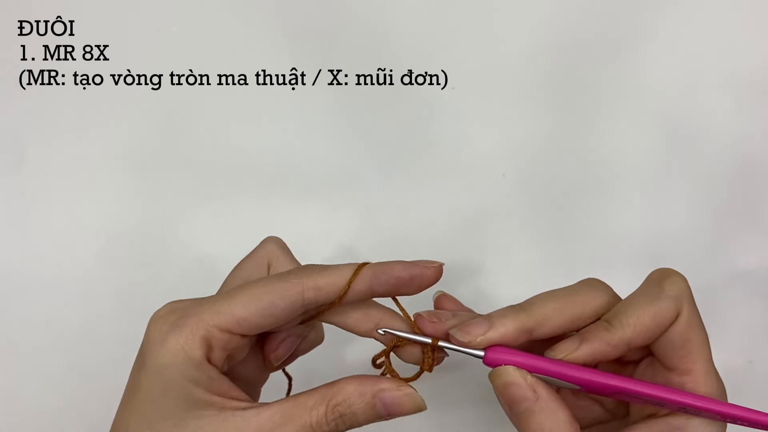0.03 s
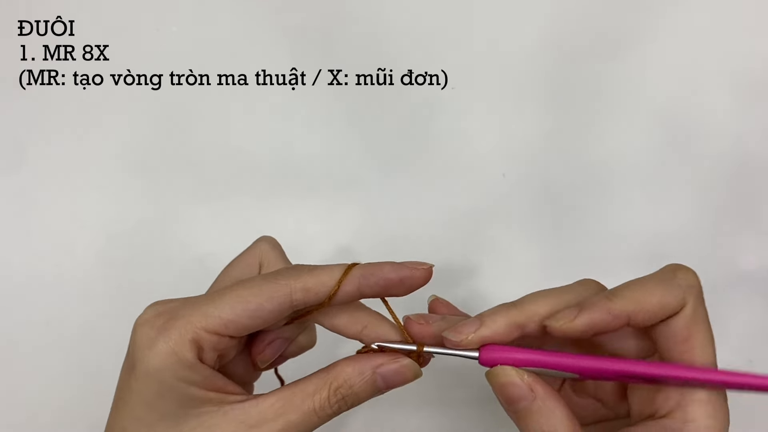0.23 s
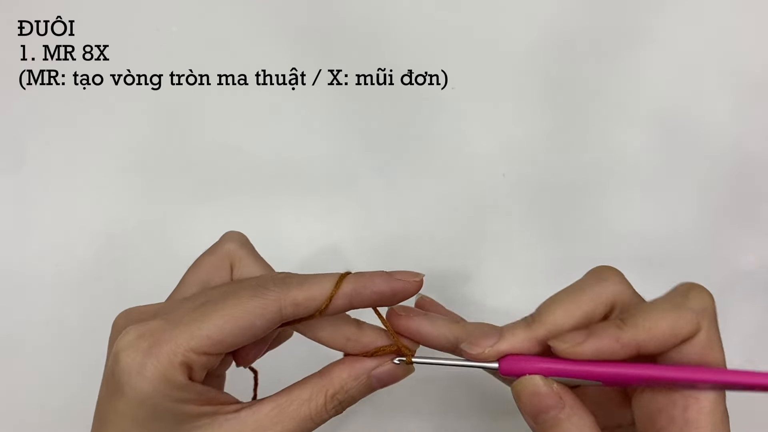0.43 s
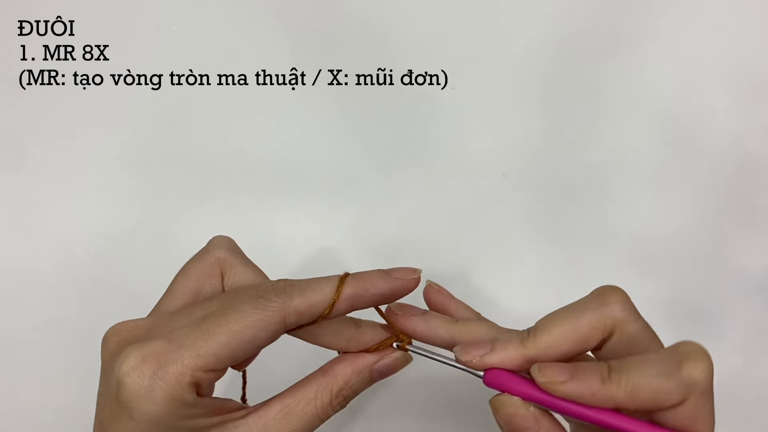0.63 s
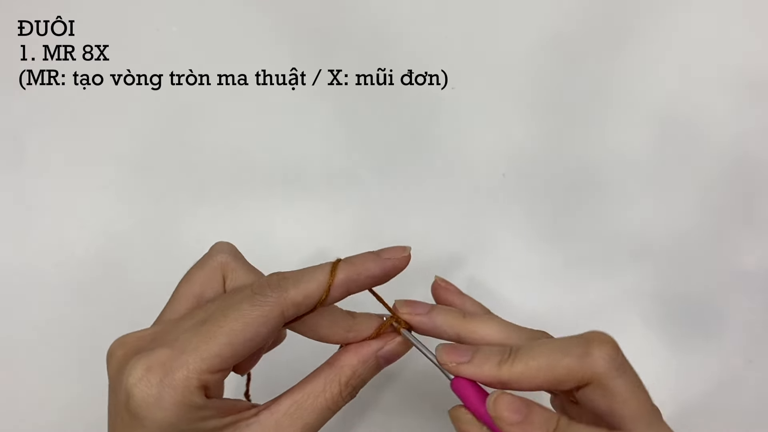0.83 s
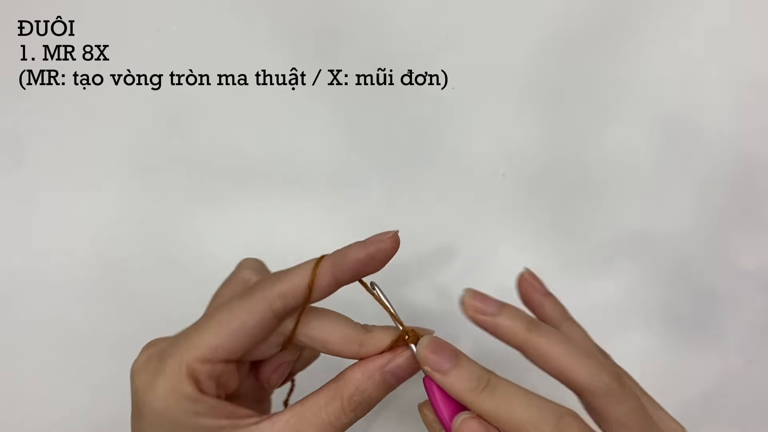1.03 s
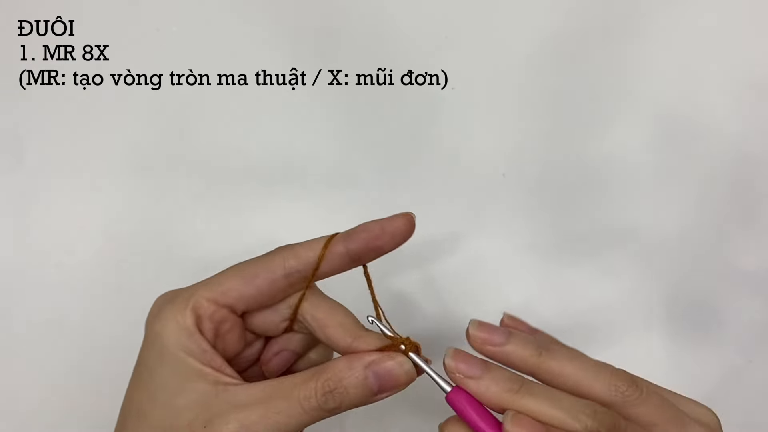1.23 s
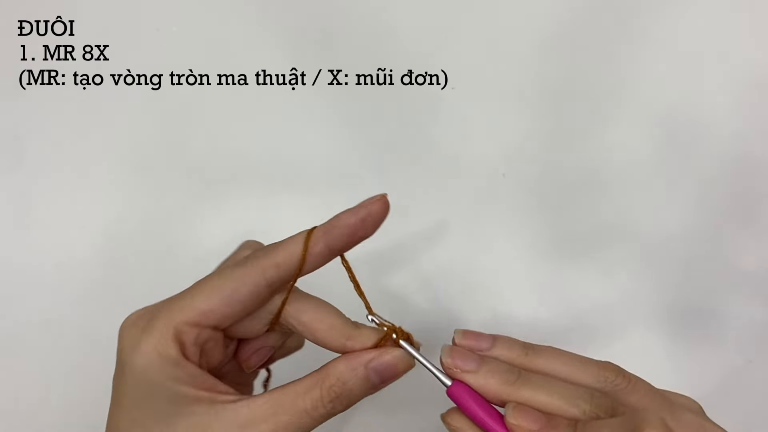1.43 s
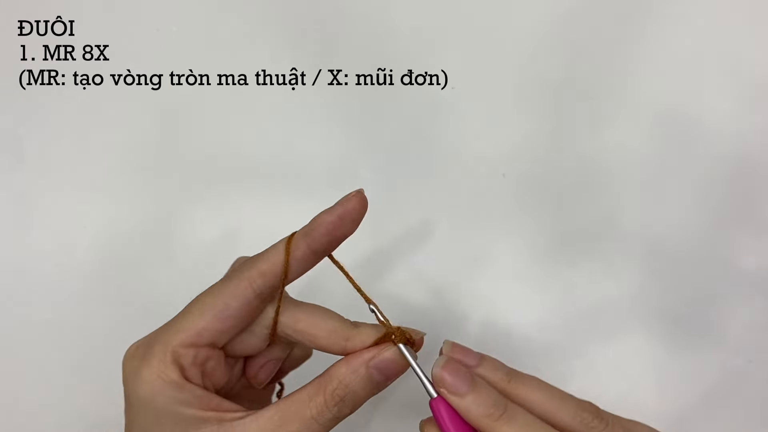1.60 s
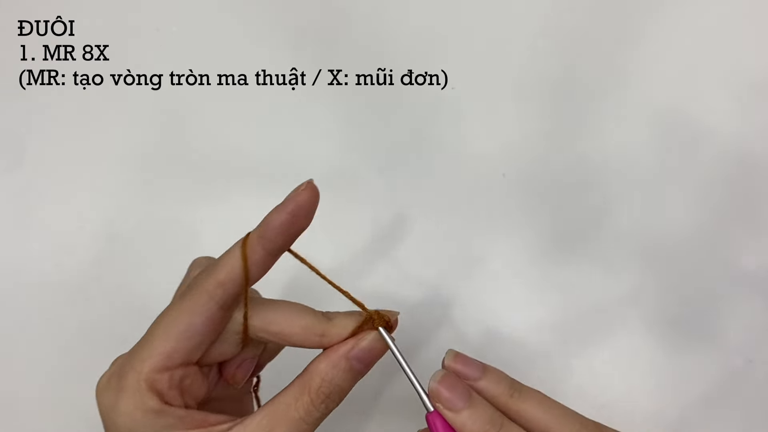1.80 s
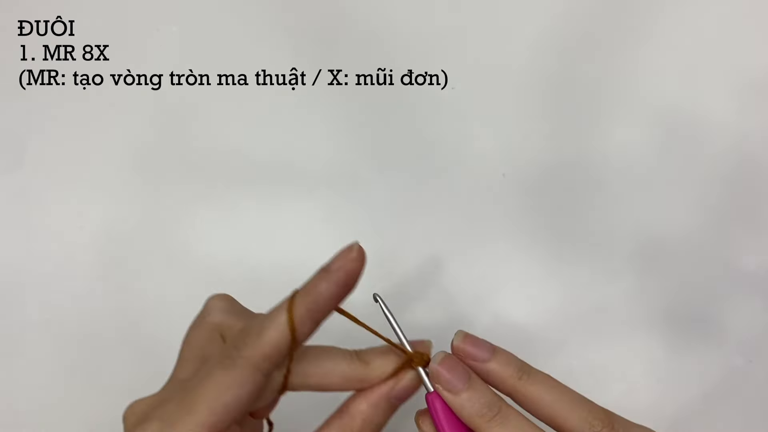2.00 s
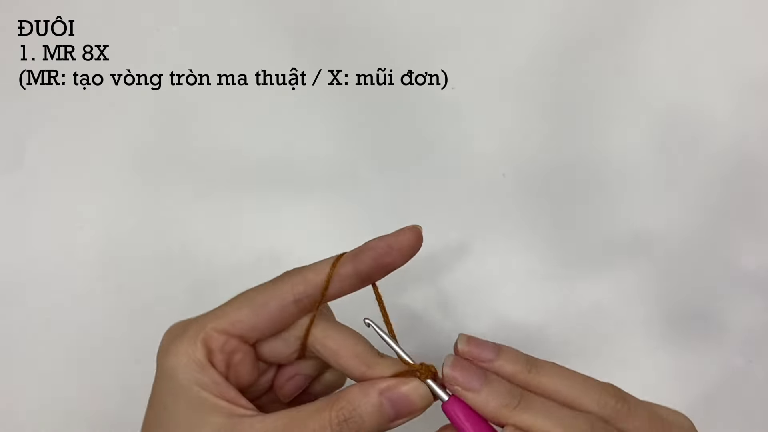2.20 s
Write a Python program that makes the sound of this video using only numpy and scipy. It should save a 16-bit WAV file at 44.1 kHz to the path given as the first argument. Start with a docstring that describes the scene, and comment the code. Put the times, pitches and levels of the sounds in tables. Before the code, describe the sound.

A crochet hook works yarn very quietly, close up in a small room. Brief, fine yarn hisses come at about 0.2, 0.4 and 1 second. The hook clicks on a fingernail at 1.1 seconds, with fainter ticks between 1.5 and 2.1. Soft finger rubs and more yarn slides follow from 1.8. Underneath, a low hum swells until 1.2 seconds, then fades over muffled traffic.

```python
"""A small, quiet room, where a metal crochet hook works yarn close to a pair of microphones.
A low drone, probably a motor outdoors, swells and fades over muffled traffic and the room's air.
Fingers rub and shift, and yarn slides over the hook with a fine hiss of stick-slip friction.
The hook ticks against fingernails, each impact exciting its briefly ringing modes."""
import sys
import numpy as np
from scipy import signal
from scipy.fft import rfft, irfft, next_fast_len
from scipy.io import wavfile
from scipy.ndimage import uniform_filter1d

SR = 44100
rng = np.random.default_rng(int(sys.argv[2]) if len(sys.argv) > 2 else 0)


def waveform_to_disk(signal):
    """Save audio, clipped to [-1, 1], as 16-bit WAV at the path in sys.argv[1]."""
    frames = np.transpose(np.atleast_2d(signal))
    scaled = np.clip(frames, -1, 1) * 32767
    samples = np.round(scaled).astype(np.int16)
    wavfile.write(sys.argv[1], SR, samples)


N = 103635
TIME = np.arange(N) / SR
FFT_SIZE = next_fast_len(N + 4096)
BIN_HZ = np.arange(FFT_SIZE // 2 + 1) * SR / FFT_SIZE


def undb(db):
    """Amplitude ratio of a level in decibels."""
    return 10 ** (np.asarray(db) / 20)


def unit(x):
    """Normalisation to rms 1."""
    return x / np.sqrt(np.mean(x ** 2) + 1e-30)


def curve(rows, axis=TIME):
    """Linear interpolation of a two-column table."""
    return np.interp(axis, *np.array(rows).T)


def colour(x, spectrum):
    """Zero-phase filtering by rows of f/Hz, gain/dB."""
    hz, db = np.array(spectrum).T
    gain = undb(np.interp(np.log(np.maximum(BIN_HZ, 1)), np.log(hz), db))
    return irfft(rfft(x, FFT_SIZE) * gain, FFT_SIZE)[:N]


def spread(mid, side, width):
    """Mid-side stereo: the filtered side adds on the left and subtracts on the right."""
    return mid + colour(side, width) * np.array([[1], [-1]])


def walk(rate_hz):
    """Random modulation: smoothed Gaussian steps, rms 1."""
    hold = int(SR / rate_hz)
    steps = np.repeat(rng.standard_normal(N // hold + 2), hold)
    return unit(uniform_filter1d(uniform_filter1d(steps, hold), hold)[:N])


def diffuse_noise(spectrum, width):
    """A diffuse field: noise only partly coherent between left and right."""
    mid, side = (unit(colour(rng.standard_normal(N), spectrum)) for _ in range(2))
    return spread(mid, side, width)


# Spectrum of the room's air: f/Hz, relative level/dB
AIR_SPECTRUM = [(100, 13.5), (1500, 3), (3000, 3), (5000, -1), (7500, -2.5), (10000, -3), (12500, -5.5),
                (14000, -12), (15000, -33), (16000, -17)]
# Its stereo width: f/Hz, side re mid/dB
AIR_WIDTH = [(500, -6), (1500, -3), (3000, -9.5), (4500, -34), (14000, -9.5)]
def air():
    """Stationary broadband noise: a smooth, faint hiss."""
    return diffuse_noise(AIR_SPECTRUM, AIR_WIDTH) * undb(-74.5)


# Spectrum of far traffic: f/Hz, relative level/dB
TRAFFIC_SPECTRUM = [(20, -7), (33, -7), (45, -6), (65, 9.5), (100, 1), (140, -2.5), (190, -7.5), (270, -15),
                    (420, -18.5), (750, -28.5), (1100, -31.5), (1400, -34), (2200, -46), (5000, -77.5)]
# Its envelope: t/s, level/dB
TRAFFIC_ENVELOPE = [(0, -55), (0.17, -55), (0.3, -51.5), (0.65, -50.5), (0.85, -52), (1.05, -52),
                    (1.4, -51), (1.75, -48), (2.05, -51.5), (2.35, -56)]
# Stereo width of traffic and hollow resonance: f/Hz, side re mid/dB
DISTANT_WIDTH = [(30, -24), (70, -15.5), (140, -9), (300, -6), (550, -3), (1100, -1.5), (3000, -5.5)]
def traffic():
    """Transmission loss rises with frequency, so the walls pass mostly rumble."""
    rumble = diffuse_noise(TRAFFIC_SPECTRUM, DISTANT_WIDTH)
    flicker_db = walk(20)
    return rumble * undb(curve(TRAFFIC_ENVELOPE) + flicker_db)


# Spectrum of a hollow resonance: f/Hz, relative level/dB
HOLLOW_SPECTRUM = [(400, -23), (750, -2.5), (950, 3.5), (1100, 3.5), (1250, -6.5), (1500, -17.5),
                   (3000, -53)]
# Its envelope: t/s, level/dB
HOLLOW_ENVELOPE = [(0, -79.5), (0.57, -75.5), (0.62, -67.5), (0.68, -72), (0.85, -74), (1.05, -72),
                   (1.3, -70.5), (1.65, -66), (1.95, -69.5), (2.35, -76)]
def hollow_resonance():
    """A broad resonance: a band of noise near 1 kHz swells slowly."""
    return diffuse_noise(HOLLOW_SPECTRUM, DISTANT_WIDTH) * undb(curve(HOLLOW_ENVELOPE))


def tone(hz, wander):
    """Frequency modulation: a sine of rms 1 drifts by the fraction `wander`."""
    cycles = np.cumsum(hz * (1 + wander * walk(5.99))) / SR
    return np.sqrt(2) * np.sin(2 * np.pi * (cycles + rng.random()))


# Envelope of the drone: t/s, level/dB
DRONE_ENVELOPE = [(0, -62), (0.18, -75), (0.27, -50), (0.46, -44), (0.54, -40), (0.68, -38.5), (0.8, -37),
                  (0.9, -37), (1.02, -34), (1.18, -33), (1.27, -43.5), (1.37, -48), (1.44, -44.5),
                  (1.55, -45), (1.8, -55), (1.92, -53), (2.05, -52), (2.35, -60)]
# Wavering hums above it: start t/s, end t/s, f/Hz, level/dB
DRONE_HUMS = [(-0.1, 0.125, 130, -55), (0.193, 0.265, 130, -46), (0.265, 0.745, 135, -51),
              (0.745, 1.33, 135, -56), (1.33, 1.76, 132, -52), (1.8, 2.02, 130, -54.5),
              (2.02, 2.17, 144, -54.5), (2.17, 2.27, 135, -60), (1.38, 1.6, 192, -60),
              (1.57, 1.85, 165, -60), (1.5, 1.62, 65, -46), (1.87, 2.0, 64, -48)]
def drone(fade_s=0.02, unsteady_db=2.0):
    """Amplitude modulation: a deep tone swells and fades while higher hums come and go."""
    out = tone(hz=54.5, wander=0.0048) * undb(curve(DRONE_ENVELOPE))
    for start, end, hz, db in DRONE_HUMS:
        gate = np.clip(np.minimum(TIME - start, end - TIME) / fade_s + 0.5, 0, 1)
        out += gate * tone(hz, wander=0.016) * undb(db + unsteady_db * walk(11.07))
    return out


def strokes(rows):
    """Incoherent strokes add in power, each a Gaussian bell as it speeds up and slows."""
    powers = (undb(db) ** 2 * np.exp(-np.pi * ((TIME - at) / length) ** 2) for at, length, db in rows)
    return np.sqrt(sum(powers))


def stick_slip(slips_per_s=6000, scatter_db=2):
    """Stick-slip friction: dense, random impulses of uneven size."""
    slips = rng.random(N) < slips_per_s / SR
    return slips * rng.standard_normal(N) * undb(scatter_db * rng.standard_normal(N))


def friction(spectrum, rows):
    """Source and filter: slips are shaped in spectrum, then swell with each stroke."""
    return unit(colour(stick_slip(), spectrum)) * strokes(rows)


# Fingers rubbing handle and loop; hook scraping skin and nail: centre t/s, duration/s, level/dB
RUB_STROKES = [(0.395, 0.025, -76), (1.785, 0.024, -56), (1.99, 0.059, -64), (2.1, 0.048, -58.5),
               (2.19, 0.066, -67)]
SCRAPE_STROKES = [(0.394, 0.017, -72.5), (1.145, 0.053, -68.5), (1.662, 0.047, -78.5), (1.768, 0.014, -76),
                  (2.095, 0.042, -81)]
# Their spectra: f/Hz, relative level/dB
RUB_SPECTRUM = [(200, 18), (450, 15.5), (1000, 0), (1600, -3), (2200, -11), (2900, -13), (4000, -18),
                (6000, -17), (12000, -56)]
SCRAPE_SPECTRUM = [(500, -4), (1500, -10), (2200, 1), (3000, -1), (4100, -1.5), (6000, -10.5), (7600, -10),
                   (11000, -2), (16000, -18)]
def fingers(rub_rough_db=2.5, scrape_rough_db=3.6):
    """Sliding friction: skin rubs with a dull grain, and the hook scrapes it more brightly."""
    rub = friction(RUB_SPECTRUM, RUB_STROKES) * undb(rub_rough_db * walk(90))
    scrape = friction(SCRAPE_SPECTRUM, SCRAPE_STROKES) * undb(scrape_rough_db * walk(150))
    return rub + scrape


# Stereo width of the reverberation: f/Hz, side re mid/dB
ROOM_WIDTH = [(400, -5), (1500, -4), (3000, -12), (4500, -17), (14000, -13)]
def room(x, t60_s=0.25, build_s=0.012):
    """Reverberation: diffuse reflections build up, then decay exponentially."""
    t = TIME[:SR // 2]
    envelope = (1 - np.exp(-t / build_s)) * np.exp(-np.log(1000) * t / t60_s)
    responses = (unit(envelope * rng.standard_normal(len(t))) / np.sqrt(len(t)) for _ in range(2))
    mid, side = (signal.fftconvolve(x, response)[:N] for response in responses)
    return spread(mid, side, ROOM_WIDTH)


# Pulls of yarn: centre t/s, duration/s, hiss level/dB, whistle level/dB, whistle f/Hz, sheen level/dB
YARN_PULLS = [(0.178, 0.044, -84, -99, 7340, -70), (0.265, 0.068, -80, -93, 7400, -74),
              (0.395, 0.013, -68, -70.5, 7700, -81), (0.4, 0.06, -73, -83, 7700, -87),
              (0.944, 0.057, -72.5, -78.5, 7100, -66), (1.003, 0.012, -80, -78, 7100, -90),
              (1.025, 0.12, -79, -91, 7100, -73), (1.136, 0.073, -71.5, -76, 7640, -71),
              (1.469, 0.038, -73.5, -79.5, 7500, -88), (1.778, 0.04, -84, -78, 7200, -94),
              (1.885, 0.028, -80, -81, 7260, -84), (1.975, 0.063, -66.5, -68.5, 7400, -62),
              (2.102, .06, -80, -88, 7300, -74), (2.179, 0.065, -77, -86, 7300, -73),
              (2.34, 0.085, -83, -90, 7300, -84)]
# Spectra of the fibres' hiss and its airy sheen: f/Hz, relative level/dB
HISS_SPECTRUM = [(1500, -22), (2300, -16), (2950, 4.5), (3800, -7), (5000, -3.5), (6500, -15), (8400, -4),
                 (9700, 10), (11000, 0), (13000, 9), (15800, -15)]
SHEEN_SPECTRUM = [(9000, -35), (13000, -12), (14500, -3.5), (16000, 4.5)]
def yarn(bandwidth_hz=800, rough_db=1.3, room_db=-22):
    """Stick-slip of fibres on the hook: a fine hiss and a resonant whistle, pitched pull by pull."""
    whistle = np.zeros(N)
    for at, length, _, db, hz, _ in YARN_PULLS:
        resonance = signal.iirpeak(hz, hz / bandwidth_hz, SR)
        band = signal.lfilter(*resonance, signal.lfilter(*resonance, stick_slip()))
        whistle += unit(band) * strokes([(at, length, db)])
    hiss = friction(HISS_SPECTRUM, [(at, length, db) for at, length, db, *_ in YARN_PULLS])
    sheen = friction(SHEEN_SPECTRUM, [(at, length, db) for at, length, *_, db in YARN_PULLS])
    slide = (hiss + sheen + whistle) * undb(rough_db * walk(69.64))
    return slide + undb(room_db) * room(slide)


def mode(t, hz, t60_s):
    """Free vibration of a damped oscillator."""
    return np.exp(-np.log(1000) * t / t60_s) * np.sin(2 * np.pi * hz * t)


def excitation_db(hz, tilt, accent_hz, accent_db=4.5, width_octaves=0.3):
    """An impact's spectrum: a tilt about 3 kHz and an accent set by where the hook is struck."""
    accent = accent_db * np.exp(-(np.log2(hz / accent_hz) / width_octaves) ** 2)
    return tilt * np.log2(hz / 3000) + accent


# Hook on nail: t/s, relative level/dB, tilt/(dB/octave), room send/dB, knock/dB, contact/s, accent f/Hz
HOOK_TICKS = [(1.1003, -42.5, -0.5, -9.5, -18, 0.000068, 1550),
              (1.4509, -62.5, 14.5, -8.5, -30, .0001, 11000), (1.64, -58.5, -4, -5, 5.5, 0.00042, 2500),
              (1.768, -64.5, -7, -2, -12, 0.00045, 1590), (2.087, -69.5, -15, -2, 7, .0007, 1800)]
# Modes of the hook held in the fingers: f/Hz, relative level/dB, T60/s
HELD_HOOK_MODES = [(1434, 3.5, 0.015), (1870, -8, 0.021), (2532, -0.5, 0.021), (3120, -2.5, 0.011),
                   (3580, 0.5, 0.011), (4590, -5.5, 0.013), (5830, -6.5, 0.011), (6780, -3, 0.0078),
                   (7500, -5.5, 0.018), (10020, -15, 0.026), (12200, -19, 0.0094), (15000, -35, .007)]
# Spectrum of a tick as the room returns it: f/Hz, relative level/dB
TAIL_SPECTRUM = [(700, -6.5), (1400, 2), (2100, -3.5), (2900, 3), (4200, -8), (6000, -9.5), (7500, -11),
                 (11000, -26), (16000, -36)]
def hook(detune=0.0096, crack_s=0.0015, crack_db=-14.5):
    """Impact excites a crack and damped modes; soft contact slows the onset and adds a dull knock."""
    t = TIME[:SR // 40]
    direct, to_room = np.zeros(N), np.zeros(N)
    for at, db, tilt, room_db, knock_db, contact_s, accent_hz in HOOK_TICKS:
        ring = np.zeros(len(t))
        for k, (hz, mode_db, t60_s) in enumerate(HELD_HOOK_MODES):
            amplitude = (-1) ** k * undb(mode_db + excitation_db(hz, tilt, accent_hz))
            ring += amplitude * mode(t, hz * (1 + detune * rng.standard_normal()), t60_s)
        crack = unit(rng.standard_normal(len(t)) * np.exp(-t / crack_s))
        onset = 1 - np.exp(-t / contact_s)
        metal = unit(onset * (unit(ring) + undb(crack_db) * crack))
        finger_knock = undb(knock_db) * unit(onset * mode(t, hz=600, t60_s=0.006))
        start = int(at * SR)
        direct[start:start + len(t)] += undb(db) * (metal + finger_knock) / 2
        tail = [(hz, tail_db + excitation_db(hz, tilt, accent_hz)) for hz, tail_db in TAIL_SPECTRUM]
        burst = colour(signal.unit_impulse(N, start), tail)
        to_room += undb(db + room_db) * unit(burst) * np.sqrt(len(t) / N) / 2
    return direct + room(to_room)


def scene():
    """Superposition of the hands close by and the room's background."""
    return hook() + yarn() + fingers() + drone() + traffic() + hollow_resonance() + air()


# Left microphone relative to right: f/Hz, phase/rad
LEFT_PHASE = [(550, 0), (700, -.5), (870, -2.4), (1200, -2.7), (1380, -3.7), (1550, -5.3), (1800, -5.95),
              (3600, -6.28), (7250, -6.28), (7800, -7.1), (8800, -9.4), (9300, -9.7), (10900, -12.5),
              (11600, -12.7), (13000, -15.6), (13700, -16), (14600, -18.8)]
# Their balance: f/Hz, left re right/dB
LEFT_BALANCE = [(60, 0.5), (140, 1.8), (500, 0.5), (1300, .3), (2600, 2.5), (4000, 0.8), (5500, 1),
                (8000, 0)]
def record(dry, cutoff_hz=15900):
    """Interchannel phase and level differences: the left lags and is slightly louder; the top is cut."""
    balance = undb(curve(LEFT_BALANCE, BIN_HZ) / 2)
    lag = np.exp(1j * curve(LEFT_PHASE, BIN_HZ))
    response = np.array([balance * lag, 1 / balance])
    pair = irfft(rfft(dry, FFT_SIZE) * response, FFT_SIZE)[:, :N]
    lowpass = signal.ellip(10, 0.2, 80, cutoff_hz, fs=SR, output="sos")
    return signal.sosfilt(lowpass, pair)


dry = scene()
out = record(dry)
waveform_to_disk(out)
```